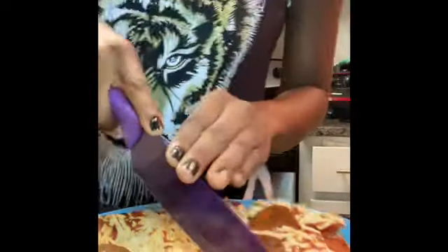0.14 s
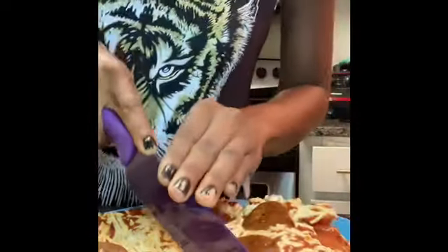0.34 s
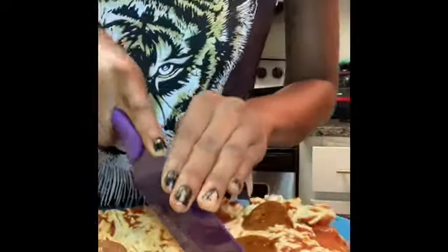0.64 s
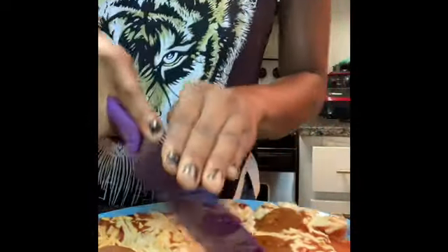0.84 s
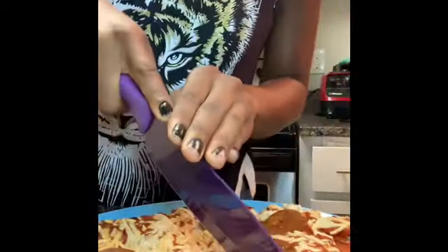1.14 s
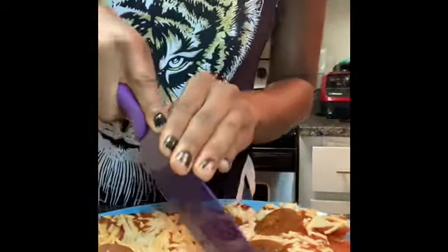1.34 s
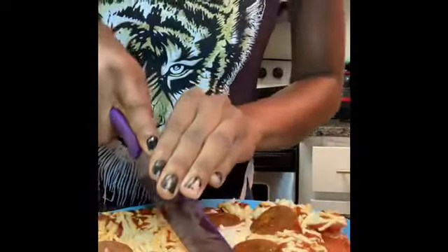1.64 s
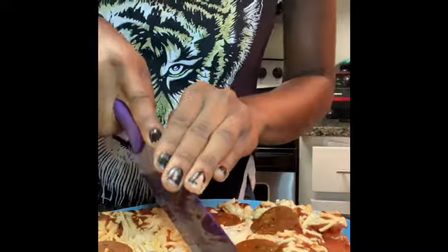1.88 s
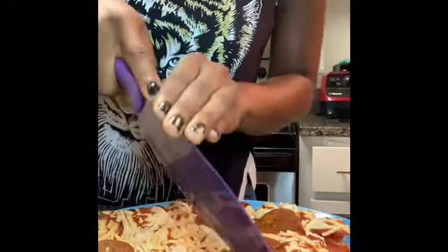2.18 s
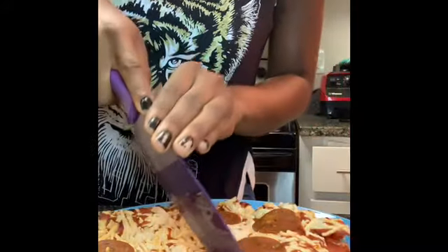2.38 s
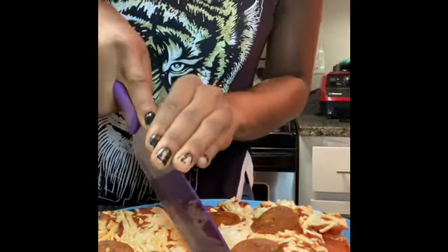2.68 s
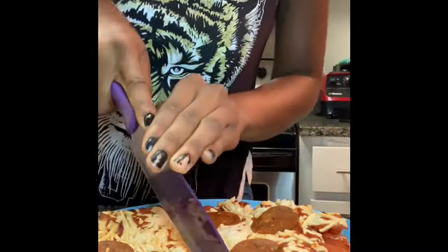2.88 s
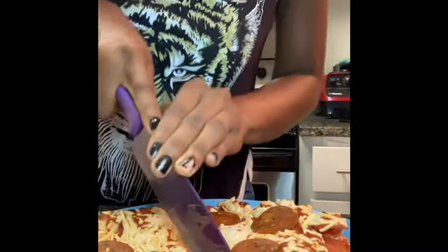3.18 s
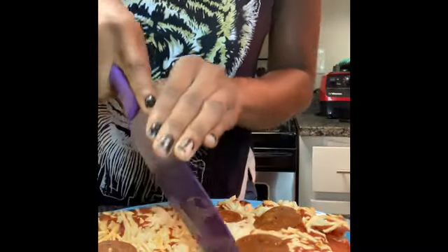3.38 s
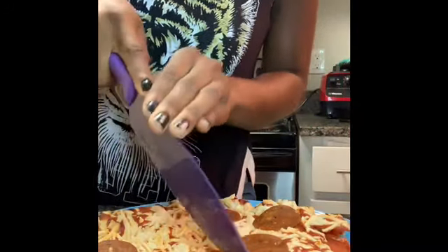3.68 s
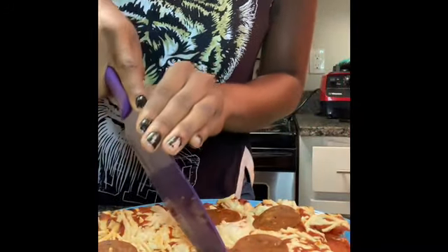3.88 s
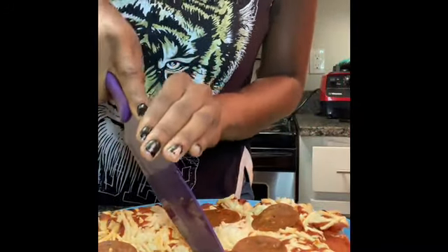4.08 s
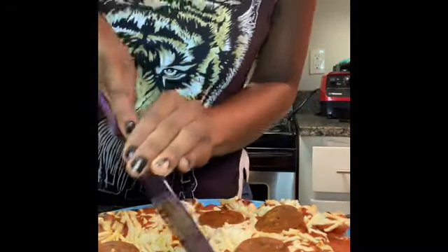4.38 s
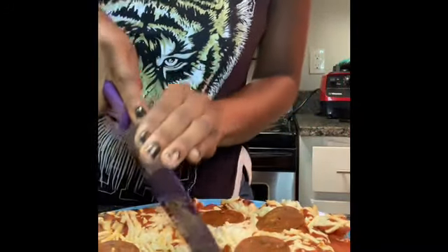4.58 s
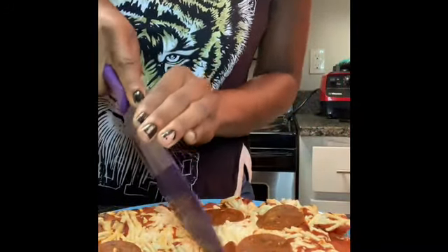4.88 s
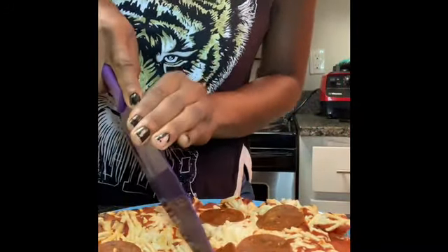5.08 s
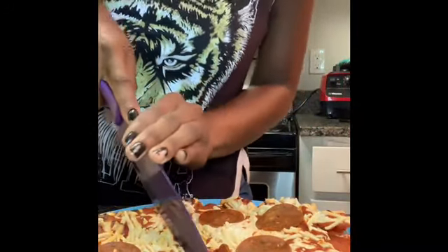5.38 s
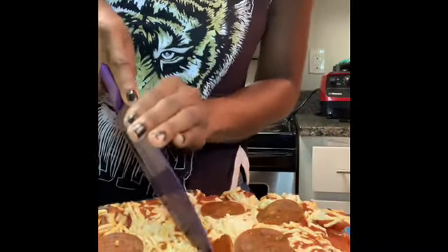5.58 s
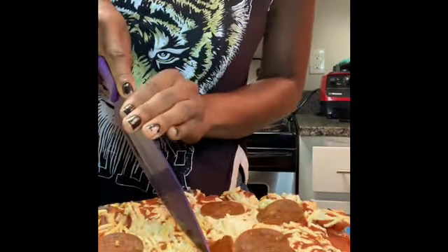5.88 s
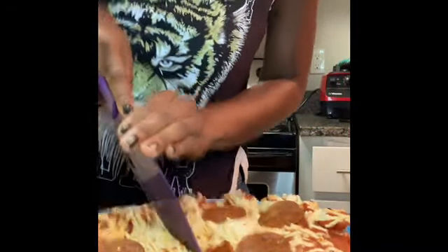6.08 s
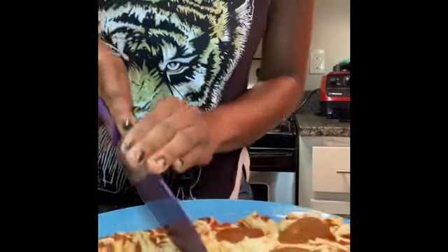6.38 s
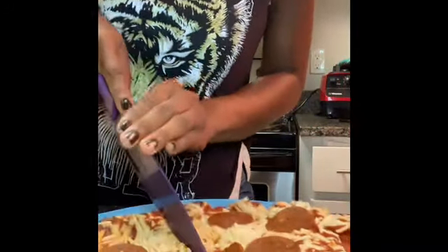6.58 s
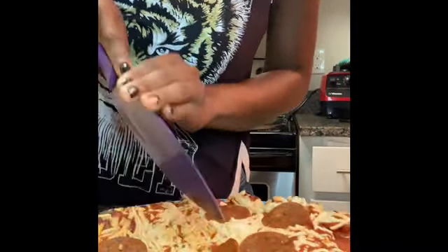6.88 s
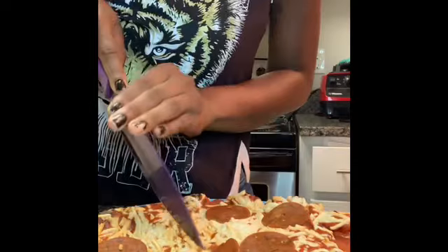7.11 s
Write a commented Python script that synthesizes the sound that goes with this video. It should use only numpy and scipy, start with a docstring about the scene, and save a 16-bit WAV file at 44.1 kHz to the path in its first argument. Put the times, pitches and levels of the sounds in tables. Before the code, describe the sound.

Crackling crust under a kitchen knife, close up, with hard knocks and faint blade clinks on a plate over a low appliance rumble.

```python
"""A kitchen knife saws and presses through a crisp pizza crust on a plate, close to a phone in a quiet kitchen.
Crust and rasp are bursts and beds of filtered noise grains; they shake resonant modes of the blade.
The edge knocks and clinks on the plate, driving modes of plate and blade; the worktop thumps as damped sines.
A small room answers with short noise tails over a low appliance rumble and hiss, all on two microphone ports."""
import sys
import numpy as np
from scipy import signal
from scipy.fft import rfft, irfft, next_fast_len
from scipy.io import wavfile
from scipy.ndimage import uniform_filter1d

SR = 44100
rng = np.random.default_rng(int(sys.argv[2]) if len(sys.argv) > 2 else 0)


def to_wav(sig):
    """Store sig (one row per channel, or 1-D mono) as 16-bit WAV at the path in sys.argv[1].

    Samples outside -1..1 are clipped; the rate is SR.
    """
    pcm = np.clip(np.atleast_2d(sig), -1, 1) * 32767
    pcm = np.round(pcm).astype(np.int16)
    wavfile.write(sys.argv[1], SR, pcm.T)  # frames by channels


N = 319581

# Levels in the tables are relative: each sound is shaped further on its way to the microphone.

# appliance rumble and air hiss, spectral shape: [f/Hz, level/dB per Hz]
RUMBLE_SPECTRUM = [(12, -24.5), (20, -3.5), (43, -0.5), (70, -7.5), (130, -2.5), (189, -2), (210, -10.5),
                   (243, 2.5), (295, -10.5), (358, -6), (398, -13), (416, -18.5), (468, -11.5),
                   (586, -23.5), (700, -22), (910, -47.5), (1540, -120)]
HISS_SPECTRUM = [(400, -15.5), (700, 3), (1100, 8), (2000, -2.5), (4000, -17.5), (8000, -36),
                 (12000, -23.5), (16000, -33.5)]
RUMBLE_DB, HISS_DB = -46.5, -65.5

# room decay: [f/Hz, t60/s]
ROOM_T60 = [(300, 0.61), (1000, 0.35), (3000, 0.34), (8000, 0.01), (15000, 0.061)]
# close reflections that differ at the ports: [f/Hz, level/dB]
SCATTER_SPECTRUM = [(1500, -28.5), (4000, -3), (8000, -19), (14000, -19)]
SCATTER_T60_S = 0.017
# phase by which the left port leads the right: [f/Hz, lead/rad]
PORT_LEAD = [(0, 0), (600, -0.5), (860, -2.4), (1210, 0.1), (1720, -1.2), (2670, -0.8), (3360, 1.6),
             (3790, 1.7), (4480, 1.4), (6720, 3.0), (10300, 3.3), (11500, 3.8), (14600, 6.0), (16400, 6.3)]
# diffuse sound that differs at the ports: [f/Hz, level/dB]
UNSHARED_SPECTRUM = [(100, -73), (300, -15.5), (800, -2.5), (3000, 1), (7000, 2.5), (10000, -34.5),
                     (14000, 20)]

# microphone response: [f/Hz, level/dB]
MIC_RESPONSE = [(5000, -1), (9000, 1), (12000, -1), (14500, -10), (16000, -9)]
CEILING, TOP_HZ = .75, 15900  # full scale 1; upper band edge

# worktop under the press: [t/s, level/dB, f/Hz]
THUMPS = [(0.417, -33, 84), (0.633, -32, 56), (1.537, -29.5, 99.5), (1.616, -35.5, 81.3),
          (1.546, -42.5, 242), (1.625, -43.5, 260), (4.378, -36, 91.4), (6.153, -44, 84)]
# plate chattering on the worktop: [start t/s, length t/s, level/dB]
CHATTERS = [(0.156, 0.033, -43), (.625, 0.058, -49), (1.53, 0.054, -48.5), (1.621, 0.036, -48.5)]
# low mode of the chattering plate: [f/Hz], then [level/dB, t60/s]
BASE_HZ = [608]
BASE_MODES = [(-19.5, 0.15)]

# plate modes: [f/Hz], then for each [level/dB, t60/s]
PLATE_HZ = [292, 405, 611, 662, 750, 884, 1200, 1362, 1555, 1728, 2033, 2261, 2540, 2821, 3666, 4030, 4745,
            5395]
PLATE_MODES = [(0.5, 0.033), (-7.5, 0.083), (-5.5, 0.066), (-8.5, 0.091), (-0.5, 0.037), (6.5, 0.012),
               (-3.5, 0.055), (-12, 0.13), (-8, 0.05), (-9, 0.038), (-8, 0.14), (-6.5, 0.15), (-13, 0.08),
               (-14, 0.1), (-4, 0.09), (-13, 0.1), (-6, 0.07), (-4, 0.045)]
# blade modes: [f/Hz], then for each [level/dB, t60/s]
BLADE_HZ = [1375, 1462, 1595, 2035, 2821, 3735, 4760, 11400, 13000]
BLADE_MODES = [(-4, 0.019), (-4.5, 0.047), (-5, 0.035), (-15, 0.075), (-7.5, 0.055), (-9, 0.05), (-8, 0.06),
               (-10.5, 0.019), (-9, 0.048)]
# how freely the blade rings between hand and crust: [t/s, level/dB]
BLADE_FREEDOM = [(0, -4), (.3, -1.5), (.65, 3), (.9, 0.5), (1.1, 5), (1.55, 5.5), (1.66, -5), (2.0, 4),
                 (2.68, -1), (3.0, -3), (3.3, -6), (4.1, 2), (4.44, -6.5), (5.24, -3.5), (6.0, -1.5),
                 (6.28, -12), (6.43, 0.5), (7.24, 3.5)]

# edge knocking the plate: [t/s, level/dB, weight level/dB at 700 Hz, level/dB at 2.1, 3.6 and 4.8 kHz,
# force level/dB on the plate, share of the first blow in the air, rattle t60/s]
KNOCKS = [(.157, -19, -16, -30, -23, -19, -33.5, 0.027, 0.032),
          (.472, -34, -6, -6.5, -13, -11.5, -30.5, .04, 0.055),
          (.625, -20.5, -24, -7.5, -13, -16, -28, .04, 0.035),
          (.754, -33, -10.5, -8.5, -12, -13, -31.5, .04, .038),
          (.867, -39, -3.5, -4.5, -1, -10, -30, .04, .038), (.94, -38, 0, -8, -23, -17, -33, 0.036, 0.042),
          (.974, -16, -14, -9, -14, -12, -28.5, 0.14, .045), (1.538, -23, -9, -8, -9, -4, -30.5, .04, .038),
          (2.093, -31, -6, -23, -23, -16, -30.5, .04, .038),
          (2.168, -11, -14, -14.5, -18.5, -11, -34, .1, 0.045),
          (2.217, -33.5, -8.5, -14, -17, -20.5, -31, .04, .038),
          (3.489, -34, -2.5, -23, -18.5, -26.5, -27, .04, 0.06),
          (3.563, -21.5, -12.5, -16.5, -21, -15.5, -33, .04, 0.04),
          (4.3875, -11, -33.5, -30, -39, -34, -28, 0.71, .03),
          (4.708, -35.5, -6, -25, -21, -21, -29.5, .04, .038),
          (4.744, -30.5, 0, -21.5, -13.5, -11.5, -36.5, .04, .038),
          (4.765, -12, -14, -14.5, -14.5, -11, -33, .08, .05),
          (4.818, -25.5, -9, -13, -17, -20, -30.5, .1, 0.029),
          (5.541, -35.5, -2, -12, -12.5, -17, -32.5, 0.039, 0.047),
          (5.562, -25, -8.5, -13, -20, -15, -30, .04, 0.033),
          (5.661, -34.5, -7.5, -14, -21.5, -16, -28.5, 0.036, .038),
          (5.686, -38.5, -0.5, -7, -21.5, -16, -33, 0.036, 0.05),
          (6.057, -37.5, 0, -19, -18.5, -25, -30.5, .04, .038),
          (6.184, -36, -20, -5, -19, -19, -38, .012, .05), (6.217, -17.5, -8, -7, -19, -19, -45, .15, 0.1),
          (6.25, -36.5, -10, -30, -20, -18, -42, .04, .03),
          (6.275, -17, -11.5, -18, -15, -30, -45, 0.55, 0.018),
          (6.572, -36.5, -5.5, -13, -9.5, -13, -28.5, .04, .038),
          (6.885, -28, -6, -7, -20, -16, -39, .1, .038)]
# blade lightly touching the plate: [t/s, force level/dB at 2, 2.8, 3.7 and 4.8 kHz]
CLINKS = [(.161, -34, -25, -24, -26), (.472, -32.5, -41, -38, -39), (.626, -19, -28, -23, -30),
          (.975, -20, -44, -24, -36), (1.453, -38, -39, -42, -49), (1.478, -36, -32, -23, -28),
          (1.53, -32, -28, -22, -31), (1.54, -22, -24, -24, -26), (1.577, -32, -29, -36, -32),
          (1.619, -32, -24, -33, -27), (2.169, -36, -44, -36, -25), (2.677, -49, -43, -52, -43.5),
          (4.766, -40, -29, -36, -26), (6.226, -50, -48, -55, -34), (6.573, -40, -35, -35, -38),
          (6.826, -58, -62, -48, -54)]
CLINK_LONGER = 1.59  # times the t60 of the gripped blade

# fine crumbling of the crust: [t/s, level/dB]
CRUMBLE = [(0.0, -29.5), (0.08, -36.5), (0.3, -51.5), (0.97, -59.5), (1.17, -69.5), (1.45, -75),
           (1.63, -37), (1.89, -66), (2.24, -62), (2.46, -78.5), (2.98, -71), (3.49, -67.5), (3.73, -80),
           (4.11, -78), (4.29, -65), (5.99, -76.5), (6.21, -60.5), (7.24, -76)]
CRUMBLE_TREBLE_DB, CRUMBLE_RING_DB = -4, -32
CRACKLE_DB = -9  # lone crackles against the bed
# edge rasping along the crust: [start t/s, length t/s, level/dB, added treble level/dB, blade force level/dB]
RASPS = [(0.0, 0.24, -43, 4, -66), (0.617, 0.035, -23, -3, -53.5), (0.873, 0.064, -65.5, 17, -91.5),
         (1.332, 0.054, -62, 15.5, -91), (1.438, 0.087, -54.5, -13, -74), (1.608, 0.12, -52, -4, -69.5),
         (2.776, 0.089, -62, -10, -96), (3.05, .16, -69.5, -7, -84), (4.306, 0.031, -47, -13, -75),
         (4.367, 0.02, -43, -11, -61), (4.42, 0.1, -51, -10.5, -79), (5.028, 0.016, -59, 2.5, -89.5),
         (5.204, 0.12, -50, 5, -86), (5.6, 0.065, -55.5, 0.5, -87.5), (5.974, 0.086, -54, 10.5, -85),
         (6.13, 0.051, -43, -3, -74), (6.155, 0.17, -53.5, 1, -74.5), (6.859, 0.026, -66, 20, -99)]
# edge skidding down the crust: [start t/s, length t/s, level/dB, from f/Hz, to f/Hz]
SKIDS = [(4.374, .018, -27.5, 5220, 1987)]

# crust snaps, the thin dry rim first: [t/s, level/dB, treble level/dB, depth of the break/dB]
SNAPS = [(.0108, -3, -15.5, -32), (.024, -19, -15, -38), (.0292, -8, -7, -25), (.0327, -15.5, 0.5, -14),
         (.0392, -7, -17, -26), (.0554, -33, -19, -18), (.074, -15, -8, -15), (.0767, -4.5, -27, -37),
         (.0874, -18, -25, -29), (.1047, -13.5, -12.5, -21), (.1081, -13, -23, -19),
         (.1264, -25.5, -12, -15), (.1417, -16, -15, -26), (.157, -26, -4, -3.5), (.2064, -39, 1, -27),
         (.2304, -30, -10, -1), (.2545, -27, -2.5, -6.5), (.2682, -12, -36.5, -12), (.438, -49, 0, -5.5),
         (.4715, -32, -9, -2.5), (.586, -39.5, -13, -7.5), (.624, -18.5, -9.5, -23),
         (.6312, -24.5, -23, -2.5), (.652, -36.5, 1, -19), (.739, -43, -10.5, -4), (.867, -33.5, -21, -4.5),
         (1.067, -40.5, -19, -9.5), (1.156, -52.5, -3, -19), (1.176, -52.5, -15, -12.5),
         (1.212, -55, -11, -13.5), (1.423, -53, -22.5, -4.5), (1.453, -35, -25, -7),
         (1.476, -24, -23, -6.5), (1.529, -16, -29, -10), (1.538, -19.5, -18.5, -7), (1.576, -21, -12, -12),
         (1.619, -15, -17.5, -6), (1.642, -20, -14, -10.5), (1.673, -40, -16, 7),
         (1.681, -18.5, -18.5, -6.5), (1.759, -40.5, -7, -2.5), (1.785, -29.5, -19.5, -9.5),
         (1.85, -40.5, -8, -5), (1.999, -39.5, -26, -8), (2.636, -48, -9, -4.5), (2.664, -46.5, -16, -4.5),
         (2.676, -34, -17.5, -5), (2.773, -49.5, -28, 1), (2.778, -39.5, -25.5, -6),
         (2.956, -53.5, -14.5, -5), (3.014, -50.5, -13.5, -1.5), (3.108, -58, -13, 9.5),
         (3.131, -36.5, -16.5, -5.5), (3.181, -50, -14, 0), (3.283, -37.5, -12, -7.5),
         (3.304, -51.5, -7, -1.5), (3.331, -43, -4.5, -17.5), (3.343, -39, -11, -6), (3.364, -47, -4, -8),
         (3.458, -54.5, -25, -2.5), (3.655, -52, -22, -14), (4.087, -52.5, -13, 1.5),
         (4.108, -27.5, -22, -10.5), (4.149, -49.5, -20, 1), (4.322, -47.5, -14.5, 8),
         (4.389, -31, -20.5, 5.5), (4.443, -36, -20, -11), (4.477, -48, -14.5, 2), (4.493, -48, -21, -12),
         (4.688, -54.5, -8, 8), (4.732, -38, -14.5, 0), (5.023, -51, -15.5, -3), (5.225, -42, -12.5, 4),
         (5.247, -30.5, -16.5, -11), (5.267, -42.5, -6.5, 9), (5.642, -50, -25, 6), (5.985, -52, -15.5, -3),
         (6.047, -47, -6.5, -9.5), (6.146, -35.5, -18, -1.5), (6.152, -29, -22, -9.5),
         (6.162, -34, -20, -15), (6.275, -25.5, -18.5, 0.5), (6.405, -54.5, -10, 1),
         (6.421, -53.5, -9.5, -7.5), (6.436, -49, -22, -4), (6.572, -45, -34.5, 1), (6.878, -51.5, -28, 4)]
# a deeper break lasts longer and shakes the blade more
SNAP_T60_S, DEPTH_DB_PER_DOUBLING = 0.04, 24
SNAP_RING_DB, RING_PER_DEPTH = -24, 0.61
SPOT_DB = 1.5  # each contact lands on another spot and favours other modes


def undb(db):
    """Turn decibels into an amplitude factor."""
    return 10 ** (np.asarray(db) / 20)


def along(table, hz):
    """Read (f/Hz, value) points on a log-frequency axis."""
    f, v = np.transpose(table)
    return np.interp(np.log(np.maximum(hz, 1)), np.log(np.maximum(f, 1)), v)


def colour(x, table):
    """Filter a sound by (f/Hz, level/dB) points, without phase shift."""
    n = next_fast_len(x.shape[-1])
    gain = undb(along(table, np.fft.rfftfreq(n, 1 / SR)))
    return irfft(rfft(x, n) * gain, n)[..., :x.shape[-1]]


def walk(rate):
    """Random levels held 1 / rate seconds and slewed twice; spread a little under 1."""
    hold = int(SR / rate)
    steps = np.repeat(rng.standard_normal(N // hold + 1), hold)
    return uniform_filter1d(uniform_filter1d(steps, hold), hold)[:N]


def swell(t, start, length, db):
    """One stroke's rise and fall, as half a sine."""
    return undb(db) * np.sin(np.pi * np.clip((t - start) / length, 0, 1))


def uneven_grains():
    """Dense tiny fractures of uneven size, in patches, at unit strength."""
    grains = rng.standard_normal(N) * undb(0.65 * rng.exponential(size=N) + 1.5 * walk(150))
    return grains / np.std(grains)


def ring(force, modes_hz, modes, flutter_db, flutter_hz, longer=1):
    """A force drives decaying modes of alternating sign; food and hand damp each mode unevenly."""
    out = 0
    for k, (hz, (db, t60)) in enumerate(zip(modes_hz, modes)):
        decay = np.log(1000) / (max(longer * t60, .005) * SR)
        pole = np.exp(2j * np.pi * hz / SR - decay)
        mode = signal.lfilter([0, pole.imag], [1, -2 * pole.real, abs(pole) ** 2], force)
        out = out + (-1) ** k * undb(db + flutter_db * walk(flutter_hz)) * mode
    return out


def bursts(events, contact, rise_ms, scatter_db):
    """Each contact is one break and a dying flurry of smaller ones; rows: sound in the air, force on the body."""
    size, lead_in = 4096, 256  # samples; the lead-in holds what the filter spreads backwards
    out, t = np.zeros((2, N + size)), np.arange(size // 2) / SR
    for s, db, *kind in events:
        tint, ring_db, first, t60 = contact(*kind)
        uneven = undb(scatter_db * np.minimum(rng.exponential(size=len(t)), 3.0))
        grains = rng.standard_normal(len(t)) * uneven
        grains = grains * (1 - np.exp(-1000 * t / rise_ms)) * undb(-60 * t / t60)
        grains = grains * np.repeat(undb(3.0 * rng.standard_normal(32)), 64)  # breaks come in clusters
        grains = grains / np.sqrt(np.sum(grains ** 2))
        blow = np.arange(len(t)) == int(rise_ms * SR / 1000)
        both = np.array([grains + first * blow, undb(ring_db) * (0.5 * grains + blow)])
        air, force = colour(np.pad(both, [(0, 0), (lead_in, size // 2 - lead_in)]), tint)
        spot = list(zip(300 * 2 ** (np.arange(24) / 4), SPOT_DB * rng.standard_normal(24)))
        i = int(s * SR)
        out[:, i:i + size] += undb(db) * np.array([air, colour(force, spot)])
    return out[:, lead_in:N + lead_in]


def rumble():
    """Appliances and air: a dull noise rumble that swells a little, under a faint hiss."""
    low = colour(rng.standard_normal((2, N)), RUMBLE_SPECTRUM) * undb(0.19 * walk(1.0))
    hiss = colour(rng.standard_normal((2, N)), HISS_SPECTRUM) * undb(3.5 * walk(3.0))
    return low * undb(RUMBLE_DB) / np.std(low) + hiss * undb(HISS_DB) / np.std(hiss)


def room(dry):
    """Two diffuse tails, each band dying at its own rate: one common to both ports, one that differs."""
    t = np.arange(SR // 2) / SR
    tails = 0
    for hz in 250 * 2. ** np.arange(7):
        octave = [(hz / 2, -30), (hz / 2 ** .5, -6), (hz, 0), (hz * 2 ** .5, -6), (hz * 2, -30)]
        band = colour(rng.standard_normal((2, len(t))), octave)
        tails = tails + band * undb(-60 * t / along(ROOM_T60, hz))
    tails = tails * (1 - np.exp(-t / 0.0007))
    return undb(-37.0) * signal.fftconvolve(dry[None], tails, axes=1)[:, :N]


def scatter(dry):
    """Hands, plate and worktop throw back a short smear, unlike at the two ports."""
    t = np.arange(SR // 20) / SR
    smear = rng.standard_normal(len(t)) * undb(-60 * t / SCATTER_T60_S)
    smear = smear / np.sqrt(np.sum(smear ** 2))
    return colour(signal.fftconvolve(dry, smear)[:N], SCATTER_SPECTRUM)


def thumps():
    """The worktop gives under the press: low sines that rise fast and die away."""
    out, age = np.zeros(N), np.arange(SR // 2) / SR
    envelope = (1 - np.exp(-age / 0.0063)) * np.exp(-age / 0.046)
    for s, db, hz in THUMPS:
        i = int(s * SR)
        out[i:i + len(age)] += undb(db) * envelope * np.sin(2 * np.pi * hz * age)
    return out


def chatter():
    """The plate chatters on the worktop: brief runs of uneven grains drive its low mode."""
    t = np.arange(N) / SR
    force = uneven_grains() * sum(swell(t, *row) for row in CHATTERS)
    return ring(force, BASE_HZ, BASE_MODES, flutter_db=2.0, flutter_hz=40.27)


def knocks():
    """The edge knocks the plate: a softer, longer push than a snap, dull, ringing the plate's modes."""
    def contact(weight, mid, hard, top, force_db, first, t60):
        """Spectrum (f/Hz, level/dB), force on the plate/dB, share of the first blow, t60/s."""
        tint = [(200, weight + 23), (700, weight + 35), (1300, 25.44), (2150, mid + 31),
                (3600, hard + 27), (4800, top + 23), (9000, top - 1.5), (16000, top - 16)]
        return tint, force_db, first, t60
    thud, force = bursts(KNOCKS, contact, rise_ms=1.2, scatter_db=4.5)
    return thud + ring(force, PLATE_HZ, PLATE_MODES, flutter_db=4.5, flutter_hz=130.3)


def clinks():
    """A light touch on the plate sets the upper modes of the blade singing, longer than when gripped."""
    def contact(*force_db):
        """Spectrum of the force (f/Hz, level/dB), its level/dB, share of the first blow in the air, t60/s."""
        touch = zip((2030, 2800, 3740, 4765), force_db)
        tint = [(1700, force_db[0] - 15), *touch, (9000, force_db[-1] - 25)]
        return tint, 0, 0, .02
    events = [(s, 0, *row) for s, *row in CLINKS]
    _, force = bursts(events, contact, rise_ms=.6, scatter_db=5.0)
    return ring(force, BLADE_HZ, BLADE_MODES, flutter_db=1.5, flutter_hz=69, longer=CLINK_LONGER)


def blade(force):
    """The blade rings in its modes as far as the grip lets it."""
    freedom = undb(np.interp(np.arange(N) / SR, *np.transpose(BLADE_FREEDOM)))
    return ring(force * freedom, BLADE_HZ, BLADE_MODES, flutter_db=2.0, flutter_hz=108.8)


def skids():
    """The edge skids down the crust: a gritty band of noise around a falling centre."""
    out, t = 0, np.arange(N) / SR
    for s, length, db, from_hz, to_hz in SKIDS:
        hz = np.interp(t, [s, s + length], [from_hz, to_hz])
        carrier = np.sin(2 * np.pi * np.cumsum(hz) / SR)
        grit = uniform_filter1d(rng.standard_normal(N), size=14)
        out = out + swell(t, s, length, db) * grit / np.std(grit) * carrier
    return out


def crumble():
    """Tiny crust fractures: a faint bed, louder where the edge rasps; returns the sound and the blade's force."""
    t = np.arange(N) / SR
    bed = undb(np.interp(t, *np.transpose(CRUMBLE)))
    rasp = sum(swell(t, *row[:3]) for row in RASPS)
    rasp_treble = sum(undb(row[3]) * swell(t, *row[:3]) for row in RASPS)
    rasp_force = sum(swell(t, *row[:2], row[4]) for row in RASPS)
    grains = uneven_grains()
    grit = grains * undb(3.5 * rng.exponential(size=N) + 4 * walk(120))  # sparser, lone crackles
    grit = grit / np.std(grit)
    body = grains * (bed + rasp) + grit * bed * undb(CRACKLE_DB)
    treble = grains * (bed * undb(CRUMBLE_TREBLE_DB) + rasp_treble)
    body = colour(body, [(400, -1.0), (1500, -4.0), (4000, 0), (8000, -10.5), (14000, -27.5)])
    treble = colour(treble, [(4000, -20.0), (9000, -10.5), (16000, -1)])
    force = grit * (rasp_force + undb(CRUMBLE_RING_DB) * bed)
    return body + treble, force


def snaps():
    """Brittle crust breaks: a wide crack in the air, and a jolt to the blade."""
    def contact(treble, depth):
        """Spectrum (f/Hz, level/dB), force on the blade/dB, share of the first break, t60/s."""
        tint = [(300, depth + 16), (1600, depth + 30), (2800, depth / 2 + 23),
                (4200, 19.27), (8000, treble / 2 + 25), (13000, treble + 33)]
        force_db = SNAP_RING_DB + RING_PER_DEPTH * depth
        return tint, force_db, .13, SNAP_T60_S * 2 ** (depth / DEPTH_DB_PER_DOUBLING)
    crack, force = bursts(SNAPS, contact, rise_ms=.4, scatter_db=5.0)
    return crack, force


def scene():
    """Sum the near sounds, set them in the room and spread everything over two ports."""
    crack, jolt = snaps()
    crumbs, scrape = crumble()
    near = crack + crumbs + chatter() + blade(jolt + scrape) + knocks() + clinks() + skids()
    common, differing = room(near) + rumble()
    size = next_fast_len(N)
    lead = np.interp(np.fft.rfftfreq(size, 1 / SR), *np.transpose(PORT_LEAD))
    turn = np.exp(.5j * lead)  # half the lead on each port
    differing = rfft(colour(differing, UNSHARED_SPECTRUM) + scatter(near), size)
    common = rfft(near + thumps() + common, size)
    ports = np.array([(common + differing) * turn, (common - differing) / turn])
    return irfft(ports, size)[:, :N]


def record(dry):
    """The microphone colours the sound; the phone rounds the loudest peaks and cuts the top."""
    rounded = CEILING * np.tanh(colour(dry, MIC_RESPONSE) / CEILING)
    return signal.sosfilt(signal.ellip(8, .2, 70, TOP_HZ, fs=SR, output="sos"), rounded)


dry = scene()
out = record(dry)
to_wav(out)
```